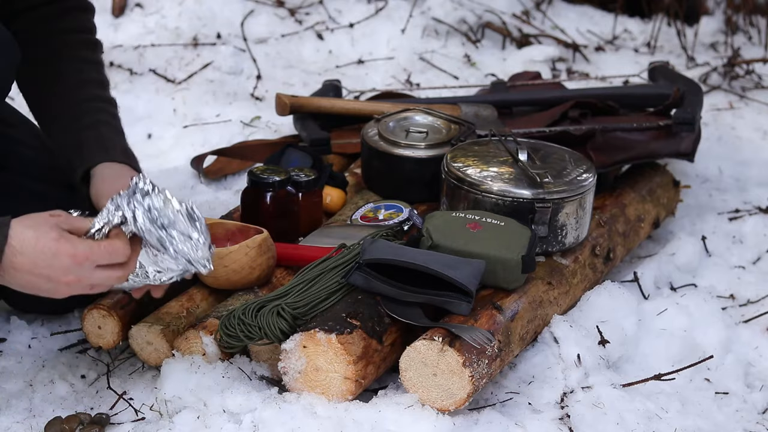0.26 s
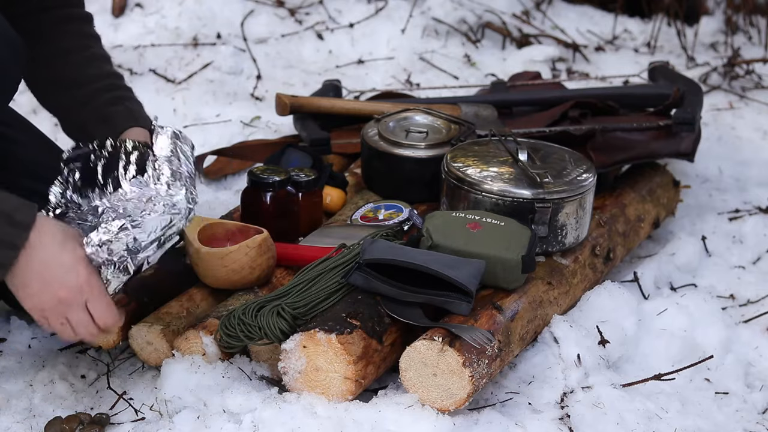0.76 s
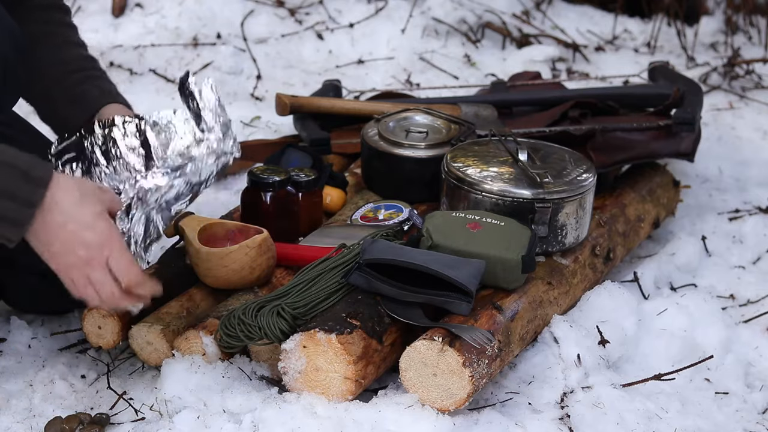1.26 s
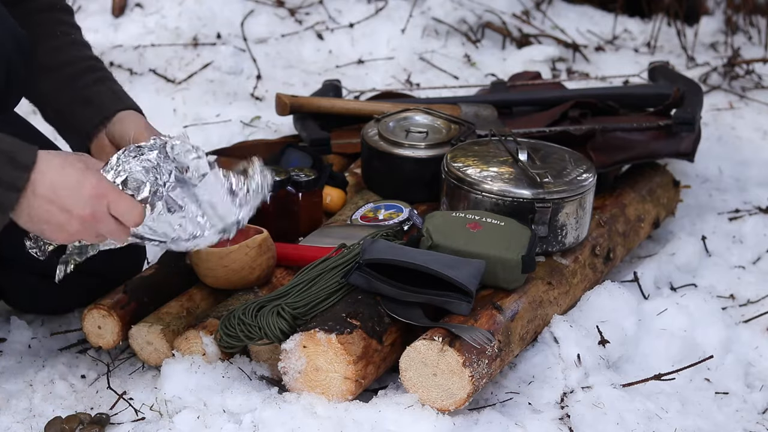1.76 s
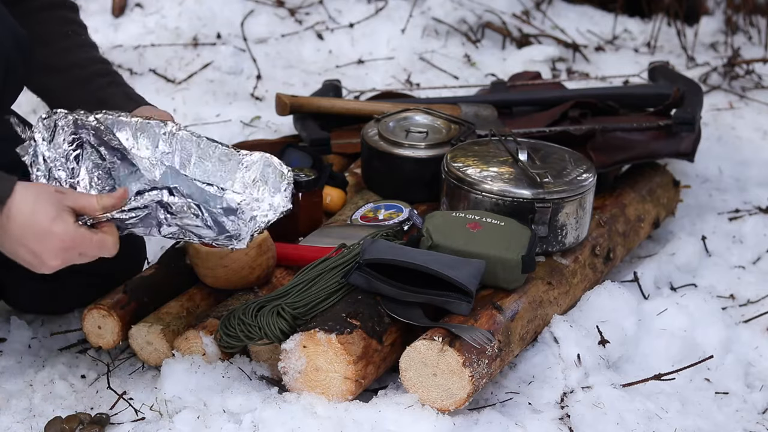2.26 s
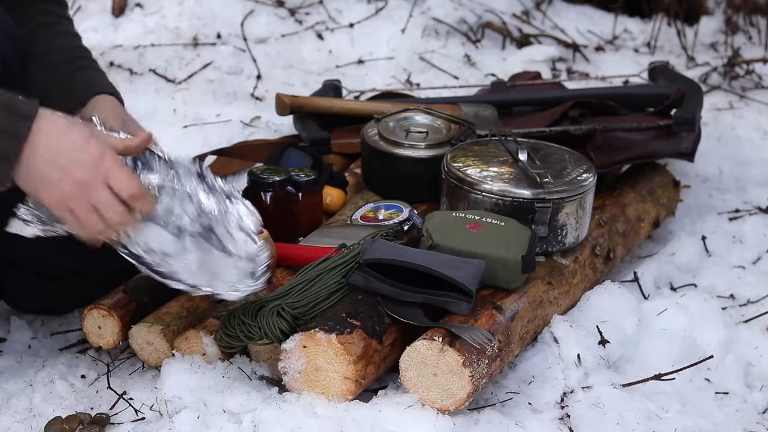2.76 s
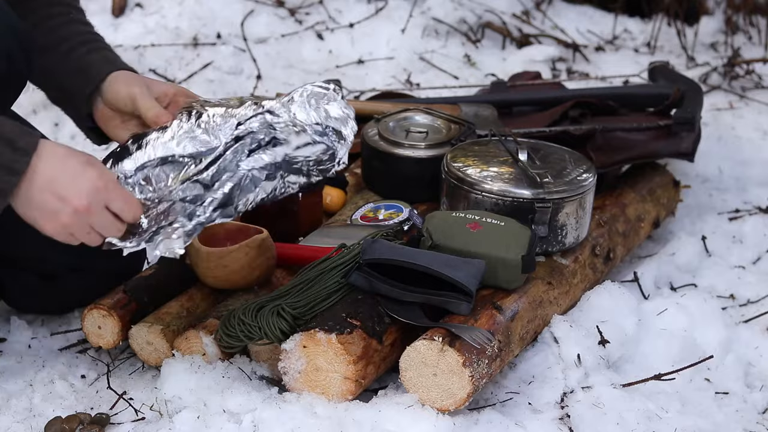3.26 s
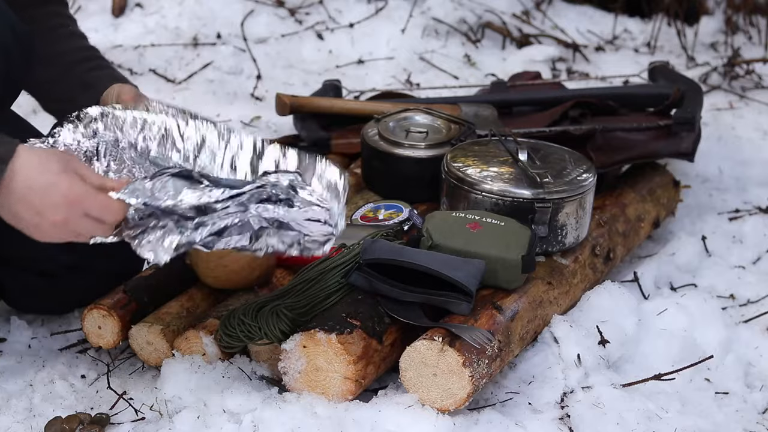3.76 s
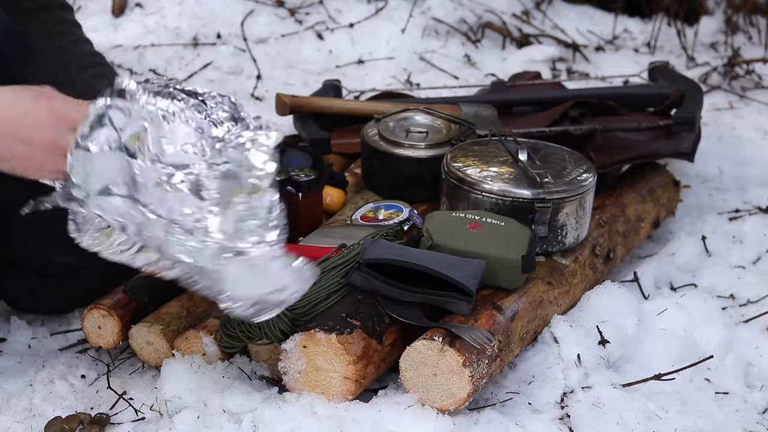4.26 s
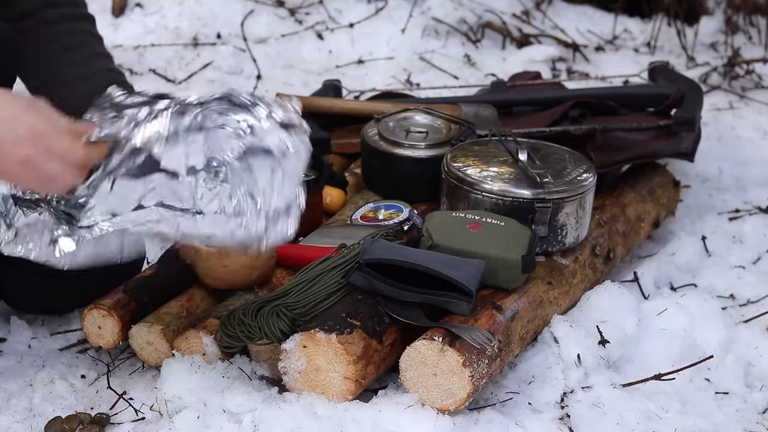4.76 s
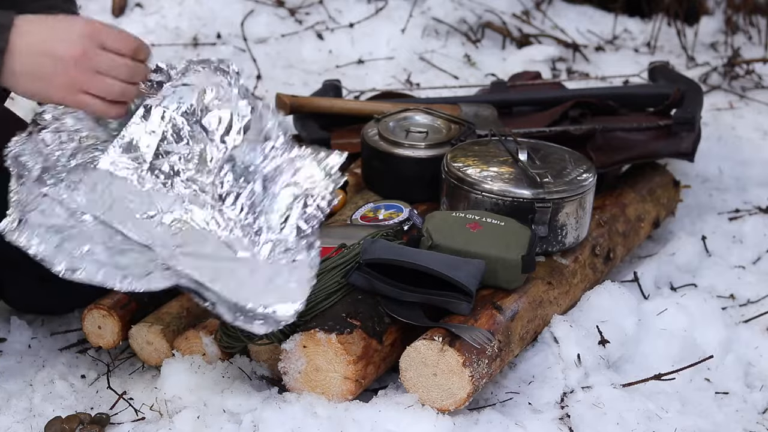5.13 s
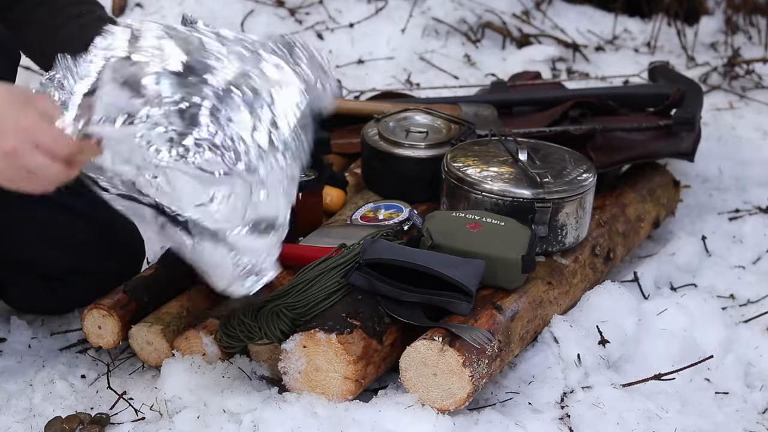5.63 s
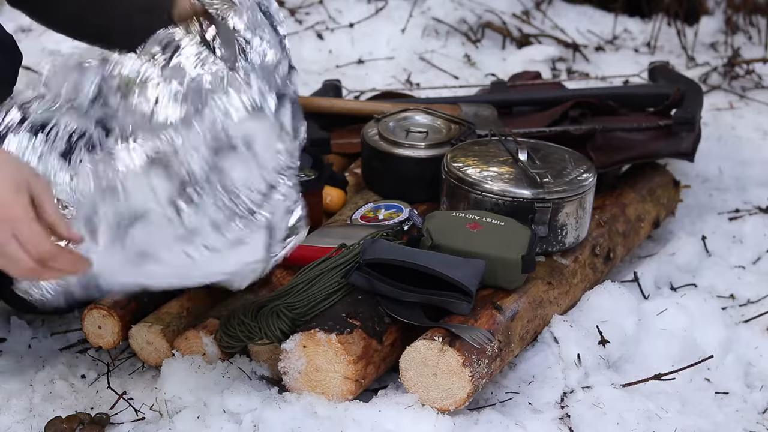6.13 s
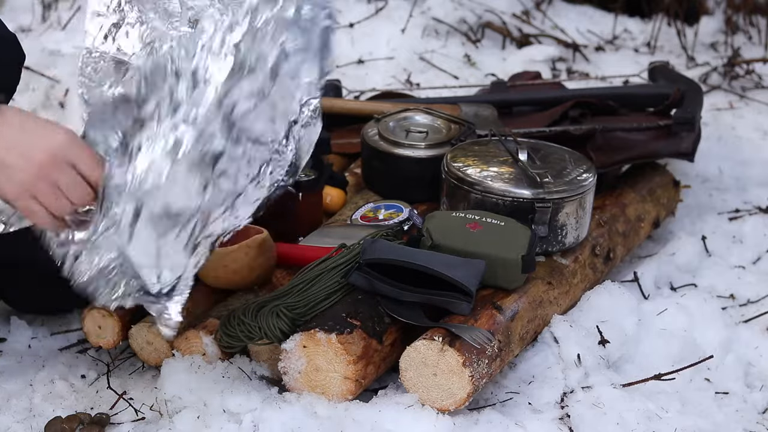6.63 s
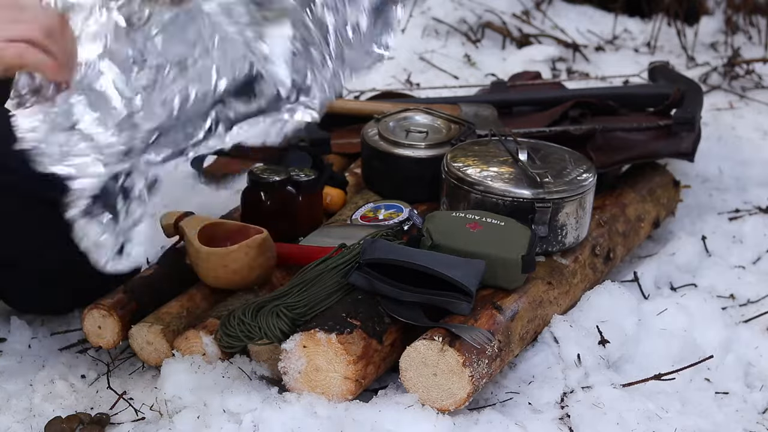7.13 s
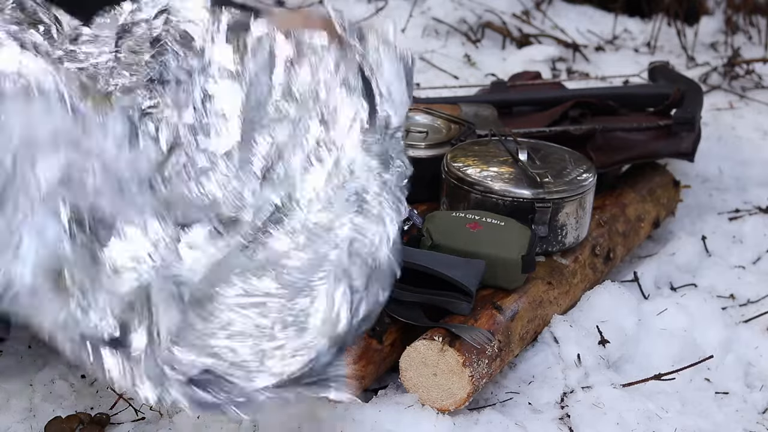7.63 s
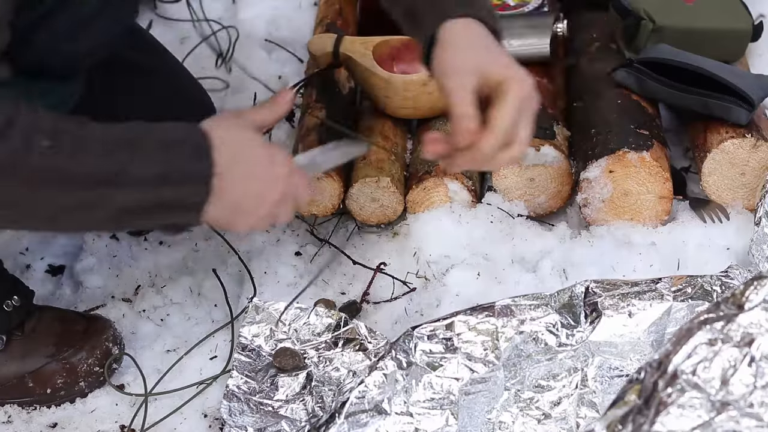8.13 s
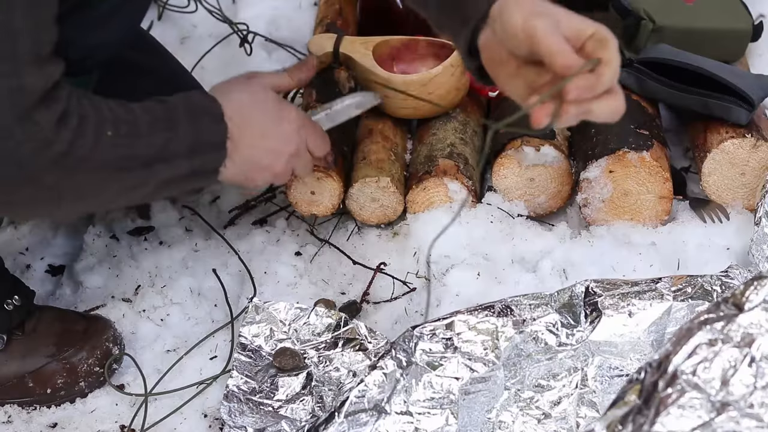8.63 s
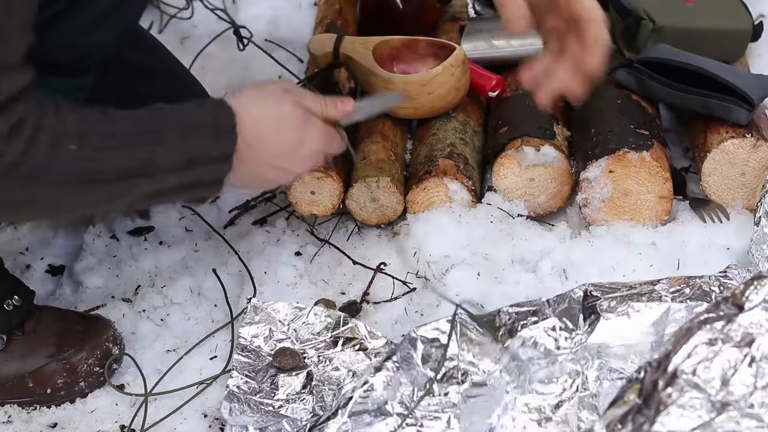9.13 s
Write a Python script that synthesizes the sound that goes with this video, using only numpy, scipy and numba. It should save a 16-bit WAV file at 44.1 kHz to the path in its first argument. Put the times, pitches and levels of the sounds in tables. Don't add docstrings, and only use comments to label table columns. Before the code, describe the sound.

Bright, dense foil crackle swells in uneven bursts, gets louder as the sheet opens, then cuts to near silence with faint clicks and a short crunch.

```python
import sys
import numpy as np
from scipy import signal
from scipy.fft import rfft, irfft
from scipy.io import wavfile
from scipy.ndimage import uniform_filter1d
from numba import njit

SR = 44100
rng = np.random.default_rng(int(sys.argv[2]) if len(sys.argv) > 2 else 0)


def nominal_scale(level):
    x = np.asarray(level, float) / 20
    return 10 ** x


def to_wav(sig):
    pcm = np.clip(np.atleast_2d(sig), -1, 1) * 32767
    pcm = np.round(pcm).astype(np.int16)
    wavfile.write(sys.argv[1], SR, pcm.T)


N = 414540


def noise():
    return rng.standard_normal(N)


def level(x, db):
    return x * nominal_scale(db) / np.sqrt(np.mean(x ** 2))


def colour(x, points):
    hz, db = np.transpose(points)
    grid = np.maximum(np.fft.rfftfreq(4096, 1 / SR), 1)
    log_gain = np.interp(np.log(grid), np.log(hz), db) * np.log(10) / 20
    cepstrum = irfft(log_gain)
    cepstrum[1:2048] *= 2
    cepstrum[2049:] = 0
    return signal.fftconvolve(x, irfft(np.exp(rfft(cepstrum))))[:N]


def walk(rate):
    hold = int(SR / rate)
    steps = np.repeat(rng.standard_normal(N // 20)[:N // hold + 1], hold)
    return 1.3 * uniform_filter1d(uniform_filter1d(steps, hold), hold)[:N]


def steady(x, hold_s=0.06):
    hold = int(hold_s * SR)
    power = uniform_filter1d(uniform_filter1d(x ** 2, hold), hold)
    return x / np.sqrt(power)


@njit
def rings(start, hz, cycles, size):
    out = np.zeros(N + 8192)
    for g in range(len(start)):
        turn = np.exp((2j * np.pi - 1 / cycles[g]) * hz[g] / SR)
        z = size[g] + 0j
        for i in range(min(int(5 * cycles[g] * SR / hz[g]) + 2, 8192)):
            out[start[g] + i] += z.real
            z *= turn
    return out[:N]


def ring_clusters(table, turns, spread, tail_s, after_db, count):
    s, db, hz = np.transpose(table)[:, :, None]
    late, tone = np.moveaxis(rng.random((len(table), count, 2)), 2, 0)
    after = np.arange(count) > 0
    start = ((s + after * late * tail_s) * SR).astype(np.int64)
    pitch = np.clip(hz * np.exp(after * spread * (2 * tone - 1)), 40, 15000)
    size = nominal_scale(db + after * (after_db - 6.5 * late)) * (-1) ** np.arange(count)
    cycles = np.full(size.size, max(turns, 0.2))
    return rings(np.minimum(start.ravel(), N - 1), pitch.ravel(), cycles, size.ravel())


# hz, level_db per Hz
HISS_COLOUR = [(20, -1), (200, -5), (2000, -13.5), (15800, -12)]


def capsule_hiss():
    return np.array([[1], [-1]]) * level(colour(noise(), HISS_COLOUR), -74.5)


# hz, level_db per Hz
AIR_COLOUR = [(15, -38), (30, -8.5), (100, -7.5), (250, -10.5), (600, -7.5), (1600, -8), (6000, -15.5),
              (8200, -17.5), (10000, -21.5), (15700, -22)]


def forest_air():
    return level(colour(noise(), AIR_COLOUR), -64.5) * nominal_scale(1.1 * walk(1.65))


# start_s, peak_db, pitch_hz
CORD_TICKS = [(0.002, -41, 7000), (8.2884, -55, 5810), (8.3514, -57, 6340), (8.3759, -49, 6420),
              (8.3844, -53, 8400), (8.389, -53, 8030), (8.4677, -56, 7310), (8.4797, -49, 6500),
              (8.4834, -57, 7940), (8.538, -52, 8040), (8.5694, -59, 5580), (8.8298, -55, 5990),
              (9.2354, -45, 8210), (9.2554, -31, 8040), (9.2872, -31, 7970), (9.3326, -35, 6900),
              (9.3454, -46, 5660), (9.386, -40, 7960)]


def ticks():
    return nominal_scale(2.5) * ring_clusters(CORD_TICKS, turns=1.5, spread=0.9, tail_s=0.011, after_db=-4.0, count=8)


# start_s, level_db, fade_s
WAD_PRESSES = [
    (9.223, -35.5, 0.017),
    (9.279, -33, 0.013),
    (9.331, -39, 0.007),
    (9.344, -39, .004),
    (9.361, -45, .003),
    (9.371, -42, .006),
]
# pitch_hz, width_hz, level_db
WAD_HOLLOWS = [
    (242, 71, -5),
    (1800, 350, 3),
    (4950, 530, 2.5),
]


def wad():
    t = np.arange(N) / SR
    push = np.zeros(N)
    for s, db, fade in WAD_PRESSES:
        push += nominal_scale(db) * (t > s) * np.exp(-np.maximum(t - s, 0) / fade)
    rush = noise() * push
    return sum(nominal_scale(db) * signal.lfilter(*signal.iirpeak(hz, hz / width, SR), rush)
               for hz, width, db in WAD_HOLLOWS)


# start_s, peak_db, pitch_hz
AIR_POCKETS = [(.255, -45.5, 1490), (1.19, -47.5, 1097), (1.23, -48, 1200), (4.66, -38, 1500),
               (1.48, -64, 180), (4.99, -52, 850), (5.085, -44, 1500), (5.18, -39, 1500), (6.08, -50, 550),
               (6.6, -72, 60), (7.29, -68, 65), (7.72, -72, 70), (7.94, -46, 680), (8.38, -59, 2200),
               (8.59, -62, 1000)]


def pockets():
    return ring_clusters(AIR_POCKETS, turns=1.3, spread=0.26, tail_s=0.041, after_db=0.5, count=16)


# start_s, peak_db, pitch_hz
TIGHT_POPS = [
    (2.441, -37, 3300),
    (3.082, -45, 7000),
    (6.571, -52, 330),
    (6.577, -38, 1900),
    (6.722, -44, 518),
    (7.29, -37, 1800),
    (9.278, -38, 8000),
]


def pops():
    return ring_clusters(TIGHT_POPS, turns=2.3, spread=0.13, tail_s=0.013, after_db=-2.0, count=8)


# start_s, peak_db, pitch_hz
CREASE_SNAPS = [(0.0428, -42, 7770), (0.3381, -36, 8330), (0.7188, -32, 4330), (1.1583, -42, 8300),
                (1.4536, -35, 7870), (1.7559, -41, 4170), (1.8457, -37, 2650), (1.8754, -32, 8260),
                (2.3925, -37, 8170), (2.5202, -32, 8250), (2.9751, -41, 8000), (3.0864, -36, 8680),
                (3.1283, -34, 7910), (3.2001, -27, 8190), (3.3124, -37, 8240), (3.3707, -34, 7930),
                (4.4009, -32.5, 7840), (4.498, -37, 1560), (5.0838, -36, 7840), (5.4081, -22, 8510),
                (6.0641, -28, 8010), (6.5246, -28, 8260), (6.9142, -23, 8340), (7.0948, -28, 8130),
                (7.293, -20, 7830), (7.8725, -32, 7780)]


def snaps():
    return nominal_scale(-12) * ring_clusters(CREASE_SNAPS, turns=1.12, spread=0.35, tail_s=0.014,
                                    after_db=4.5, count=16)


# hz, level_db per Hz
FOIL_COLOUR = [(50, -32), (100, -17.5), (170, -11.5), (350, -15), (530, -9), (1190, -4.5), (1450, -2),
               (2580, -3), (4600, -1.5), (6140, -5), (8200, 4), (10200, -10.5), (13000, -2.5),
               (15700, -8.5)]


def foil_colour(x):
    return colour(x, FOIL_COLOUR)


# start_s, peak_db
DRY_CRACKS = [(0.0011, -28), (0.125, -37), (0.3397, -37), (1.0361, -41), (1.1594, -42), (1.2424, -32),
              (1.8761, -27), (1.9487, -34), (2.3938, -35), (2.44, -29), (2.447, -33), (2.8662, -31),
              (2.9642, -39), (2.9765, -39), (2.9834, -41), (3.055, -47), (3.0872, -35), (3.091, -34),
              (3.1742, -35), (3.6432, -34), (4.2407, -36), (4.2979, -35), (4.4022, -32), (5.4097, -26),
              (6.3653, -34), (6.5257, -30), (6.9027, -23), (7.3834, -22), (9.3737, -39), (9.3861, -41)]


def cracks():
    s, db = np.transpose(DRY_CRACKS)
    pulses = np.zeros(N)
    pulses[(s * SR).astype(int)] = nominal_scale(db) * np.sign(rng.random(len(s)) - 0.5)
    crack = foil_colour(pulses)
    return crack * nominal_scale(0.8) * np.abs(pulses).max() / np.abs(crack).max()


def strays(per_s=45, scatter_db=3.2):
    when, big, way = rng.random((int(per_s * N / SR), 3)).T
    pulses = np.zeros(N)
    pulses[(when * N).astype(int)] = np.sign(way - 0.5) * nominal_scale(-scatter_db * np.log(1 - 0.95 * big))
    return signal.sosfilt(signal.butter(2, 2500, "high", fs=SR, output="sos"), foil_colour(pulses))


def creases(per_s=16000, scatter_db=1.9, turns=0.99, turns_spread=0.86, burst_db=1.0, patch_db=0.5):
    when, narrow, big, ring, way = rng.random((int(per_s * N / SR), 5)).T
    start = (when * N).astype(np.int64)
    narrow = narrow ** 0.6
    hz = 250 * 60 ** narrow
    cycles = np.maximum(turns * np.exp(turns_spread * (2 * ring - 1)), 0.2)
    avalanche_db = burst_db * walk(120)[start]
    avalanche_db += patch_db * walk(60)[start] * np.cos(3 * np.pi * narrow)
    big_db = -scatter_db * np.log(1 - 0.985 * big)
    size = np.sign(way - 0.5) * hz / np.sqrt(cycles * narrow) * nominal_scale(big_db + avalanche_db)
    return rings(start, hz, cycles, size)


def effort(t, idle_db, tugs, round_top=0.51):
    s, db, rise, fall, sizzle_db = np.reshape(tugs, (-1, 5)).T[:, :, None]
    coarse = t[::32]
    steps = np.maximum((s - coarse) / np.maximum(rise, 0.003), (coarse - s) / np.maximum(fall, 0.003))
    swell_db = db - 10 * (np.hypot(steps, round_top) - round_top)

    def total_db(each_db):
        power = nominal_scale(2 * idle_db) + nominal_scale(2 * each_db).sum(axis=0)
        return np.interp(t, coarse, 10 * np.log10(power))

    return total_db(swell_db), total_db(swell_db + sizzle_db)


LAYER_EDGES = (130, 400, 1200, 6500)
# start_s, idle_crackle_db, sway_db, flap_db, folds_db
SCENE_SHOTS = [
    (0, -69, -39, -24, -12),
    (3.08, -62, -35, -22, -10.5),
    (4.485, -58.5, -27, -24, -9),
    (5.404, -56, -30, -21, -10),
    (6.518, -54, -32, -18.5, -11),
    (8.085, -120, -30, -20, -10),
    (9.223, -70, -36, -17, -12),
]
# peak_s, peak_db, rise_s, fall_s, sizzle_db
HAND_TUGS = [(0.075, -57.9, 0.012, 0.011, 0.7), (0.162, -54.5, 0.087, 0.033, 0),
             (0.265, -55.5, 0.097, 0.019, -3.5), (0.34, -61, 0.011, 0.089, -5),
             (0.55, -47.5, 0.13, 0.024, 0.5), (0.655, -53.3, 0.066, 0.032, 0.4),
             (0.731, -45, 0.02, 0.078, -0.0), (0.827, -49.5, 0.017, 0.022, -2),
             (0.95, -53.5, 0.062, 0.14, -1), (1.232, -52, 0.049, 0.046, 0.9),
             (1.318, -48, 0.035, 0.062, 1.1), (1.457, -52.5, 0.012, 0.012, -3),
             (1.489, -47, 0.017, 0.035, -0.7), (1.607, -55.2, 0.073, 0.03, -2.5),
             (1.69, -56, 0.029, 0.11, -2), (1.883, -52.4, 0.097, 0.072, -2.5),
             (2.079, -47.5, 0.1, 0.08, -0.7), (2.245, -48, 0.043, 0.073, 0.5),
             (2.445, -52.5, 0.032, 0.019, -1.0), (2.519, -50, 0.0062, 0.063, 0.5),
             (2.729, -52, 0.016, 0.016, -1.3), (2.866, -51, 0.37, 0.031, -0.7),
             (2.963, -59, 0.23, 0.035, 0.3), (3.051, -71, 0.005, 0.032, 1),
             (3.133, -51.6, 0.01, 0.018, 0.0), (3.21, -45.4, 0.02, 0.034, 1.3),
                  (3.388, -50.5, 0.066, 0.055, -2.7), (3.418, -54, 0.4, 0.055, -0.5),
                  (3.51, -55, 0.016, 0.158, 1), (3.648, -51, 0.037, 0.005, 0.0),
                  (3.805, -50, 0.027, 0.01, -3), (3.919, -46.3, 0.12, 0.04, -1),
                  (4.118, -49, 0.3, 0.059, 0), (4.248, -48.0, 0.039, 0.043, -1.5),
                  (4.436, -51.5, 0.1, 0.021, 1), (4.575, -52, 0.33, 0.208, -3.5),
                  (4.655, -48.2, 0.029, 0.07, -1.3), (4.76, -54.4, 0.028, 0.032, 1),
                  (4.872, -52.5, 0.027, 0.15, -1), (5.099, -48, 0.032, 0.028, -3.5),
                  (5.191, -45, 0.024, 0.032, -1), (5.198, -45.8, 0.071, 0.092, -6),
                  (5.4, -56.5, 0.046, 0.007, -4),
             (5.407, -43, 0.398, 0.24, 0.34), (5.565, -40.5, 0.018, 0.041, -0.4),
                   (5.716, -45.5, 0.1, 0.019, -1.0), (5.856, -41.4, 0.067, 0.025, -0.3),
                   (5.985, -50, 0.016, 0.063, -0.5), (6.082, -42.5, 0.021, 0.062, 0.1),
                   (6.189, -43.5, 0.045, 0.067, 0.8), (6.455, -52, 0.13, 0.053, 0.8),
                   (6.522, -49, 0.398, 0.073, 0.9), (6.769, -43.5, 0.13, 0.15, 0.7),
                   (6.919, -41, 0.025, 0.043, 0.6), (7.009, -45, 0.032, 0.035, 0.5),
                   (7.107, -43.6, 0.025, 0.036, 0.0), (7.198, -44, 0.029, 0.047, 0.0),
                   (7.203, -46.5, 0.218, 0.037, 0.8), (7.306, -39, 0.018, 0.14, 1.3),
                   (7.517, -39.1, 0.026, 0.11, 1.0), (7.686, -41.5, 0.019, 0.079, 0.73),
                   (7.778, -46, 0.025, 0.042, 0.1), (7.955, -40, 0.051, 0.13, 0.78),
                   (9.228, -49, 0.007, 0.021, -0.3), (9.281, -51.5, 0.4, 0.075, -1.0),
                   (9.282, -47.5, 0.004, 0.026, 1.0)]


def rustle():
    sheet = foil_colour(level(creases(), 0) + nominal_scale(-8) * noise())
    below = [signal.sosfiltfilt(signal.butter(4, hz, fs=SR, output="sos"), sheet) for hz in LAYER_EDGES]
    layers = np.diff([0 * sheet, *below, sheet], axis=0)
    sway, flap, folds, crackle, sizzle = (steady(x) for x in layers)
    sway, flap, folds = (x * nominal_scale(0.57 * walk(7)) for x in (sway, flap, folds))
    out, pricks, clumps = np.zeros(N), strays(), walk(70)
    all_tugs = HAND_TUGS
    shot_ends = SCENE_SHOTS[1:] + [(N / SR,)]
    for (start, idle_db, sway_db, flap_db, folds_db), (end, *_) in zip(SCENE_SHOTS, shot_ends):
        shot = np.arange(max(int(start * SR), 0), min(int(end * SR), N))
        tugs = [tug for tug in all_tugs if start <= tug[0] < end]
        crackle_db, sizzle_db = effort(shot / SR, idle_db, tugs)
        extra = crackle_db + 53
        low = nominal_scale(sway_db - 0.23 * extra) * sway[shot]
        low += nominal_scale(flap_db - 0.08 * extra) * flap[shot]
        low += nominal_scale(folds_db - 0.067 * extra) * folds[shot]
        bunch_db = np.clip(1.03 - 0.086 * extra, 0, 3) * clumps[shot]
        fine = sizzle[shot] + nominal_scale(5 - 0.35 * extra) * pricks[shot]
        out[shot] = nominal_scale(crackle_db + bunch_db) * (crackle[shot] + low) + nominal_scale(sizzle_db + bunch_db) * fine
    return out


def scene():
    foil = rustle() + cracks() + snaps() + pops() + pockets() + wad()
    return foil + ticks() + forest_air() + capsule_hiss()


def top_cut(x):
    return signal.sosfilt(signal.butter(12, 16380, fs=SR, output="sos"), x)


def record(dry):
    kept = np.fft.rfftfreq(N, 1 / SR) < 15800
    mix = irfft(rfft(dry) * kept, N)
    return top_cut(mix)


dry = scene()
out = record(dry)
to_wav(out)
```